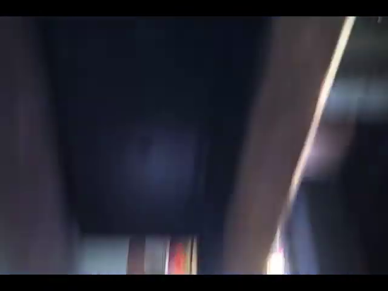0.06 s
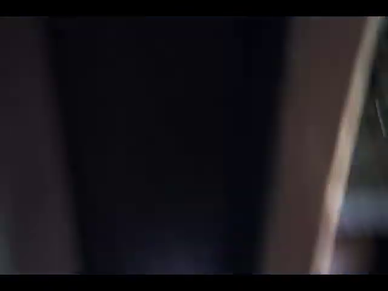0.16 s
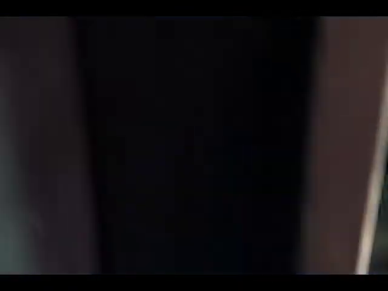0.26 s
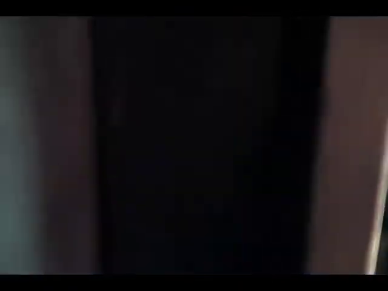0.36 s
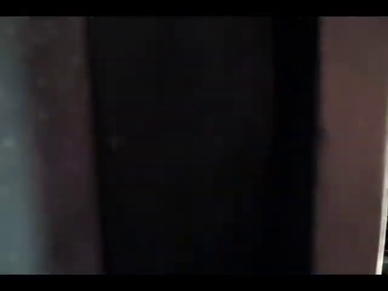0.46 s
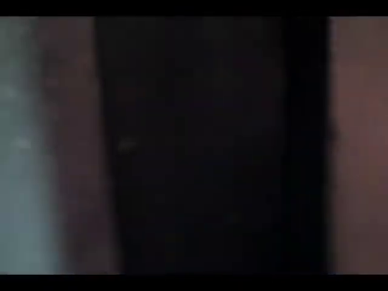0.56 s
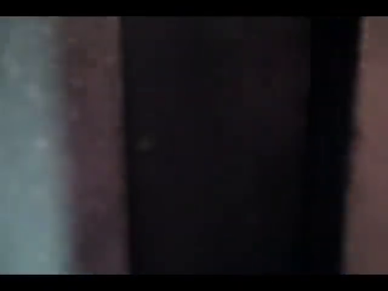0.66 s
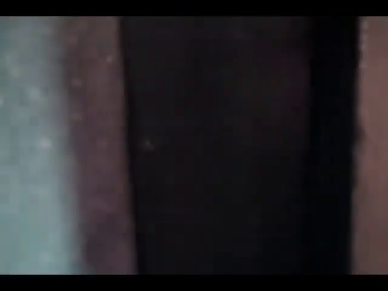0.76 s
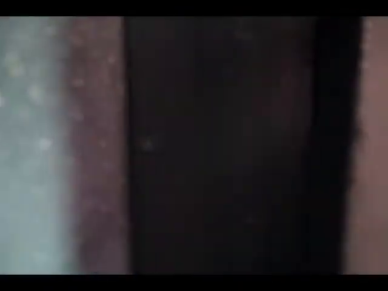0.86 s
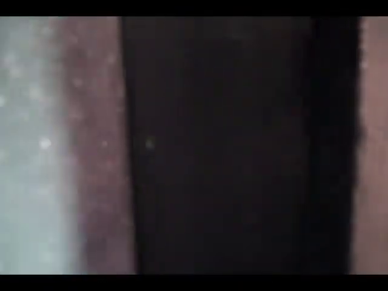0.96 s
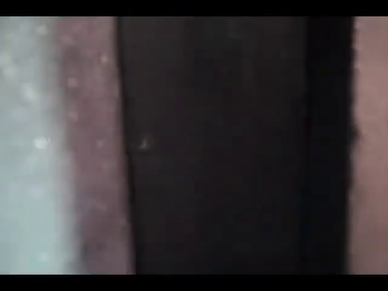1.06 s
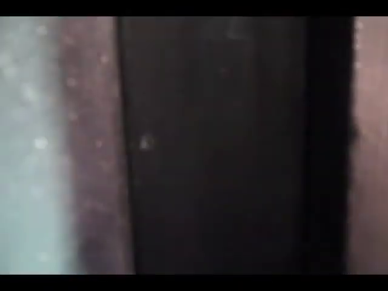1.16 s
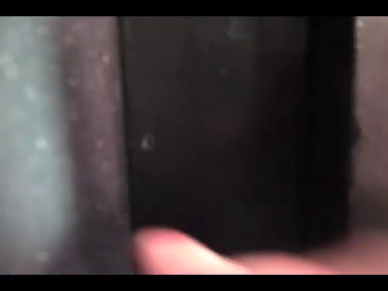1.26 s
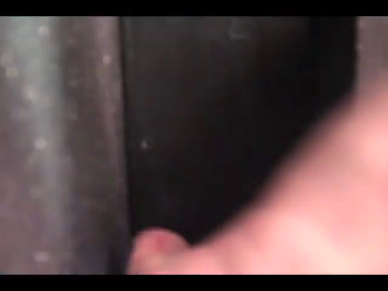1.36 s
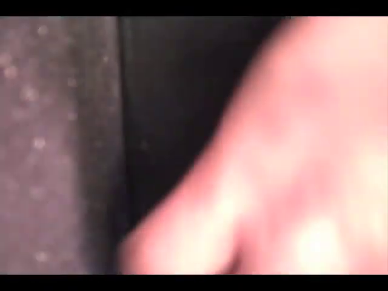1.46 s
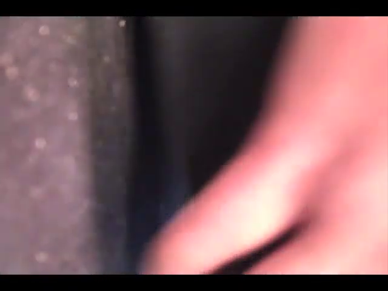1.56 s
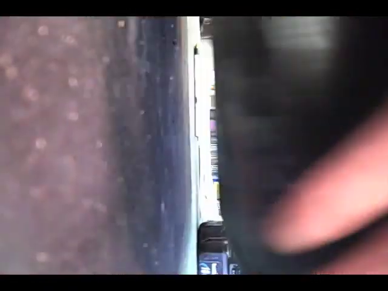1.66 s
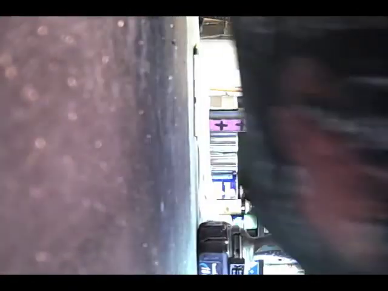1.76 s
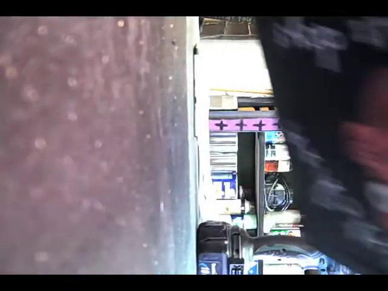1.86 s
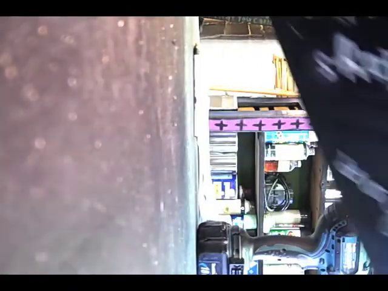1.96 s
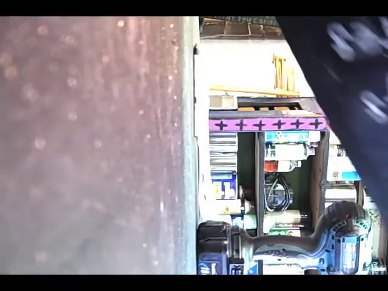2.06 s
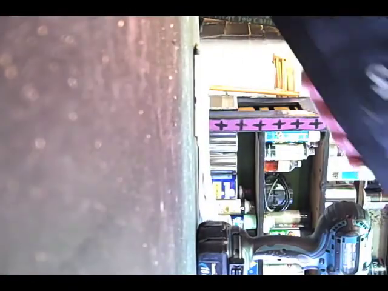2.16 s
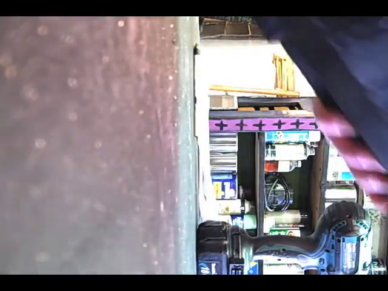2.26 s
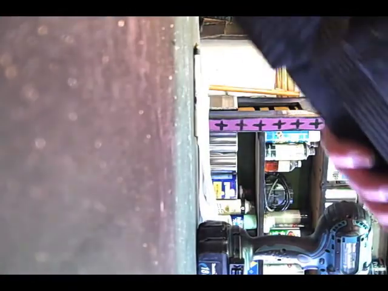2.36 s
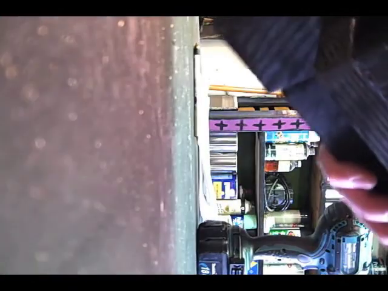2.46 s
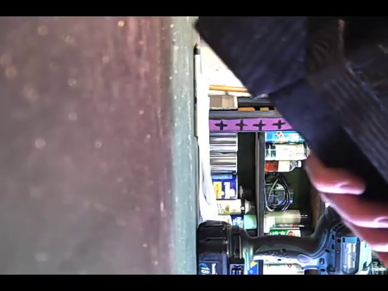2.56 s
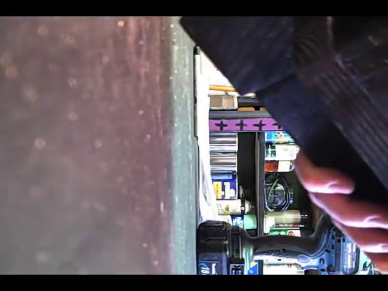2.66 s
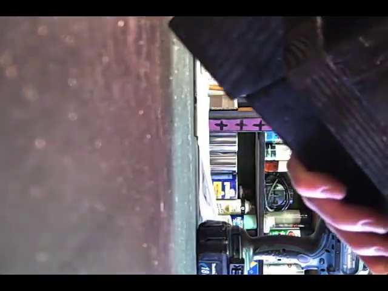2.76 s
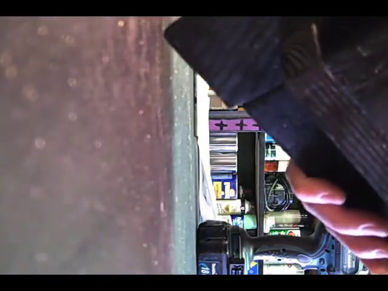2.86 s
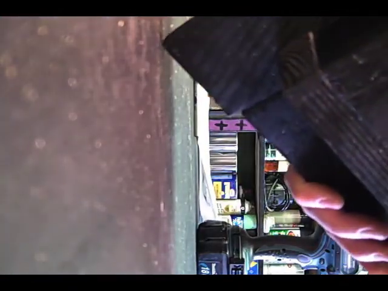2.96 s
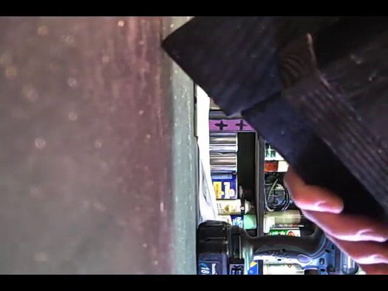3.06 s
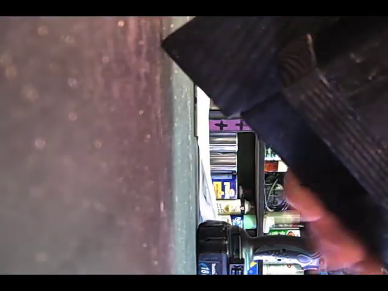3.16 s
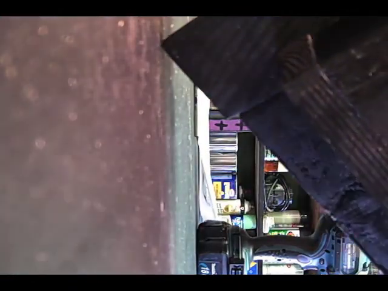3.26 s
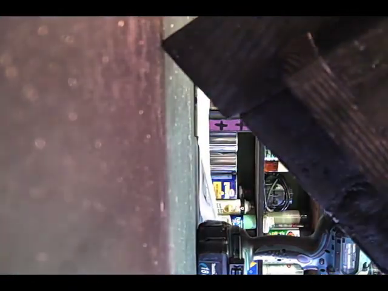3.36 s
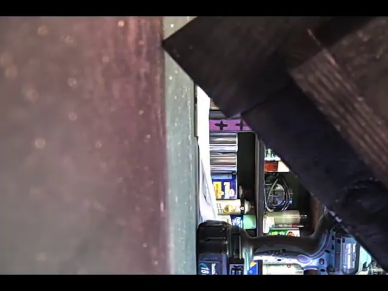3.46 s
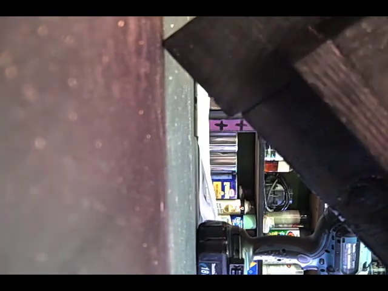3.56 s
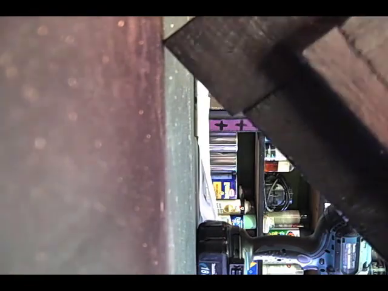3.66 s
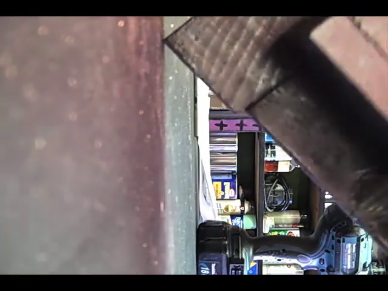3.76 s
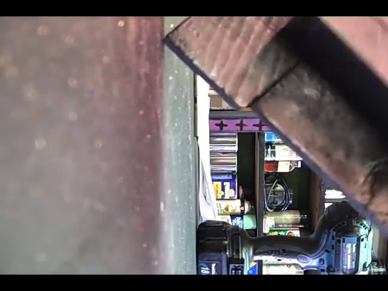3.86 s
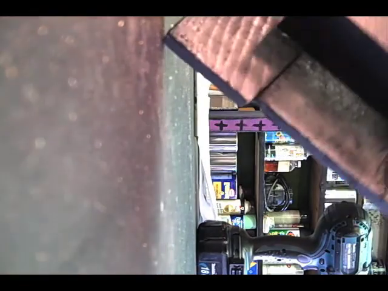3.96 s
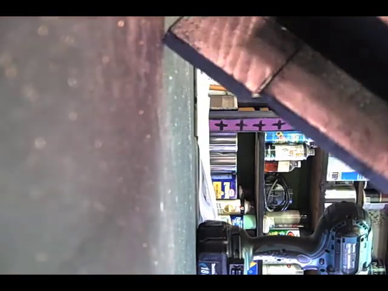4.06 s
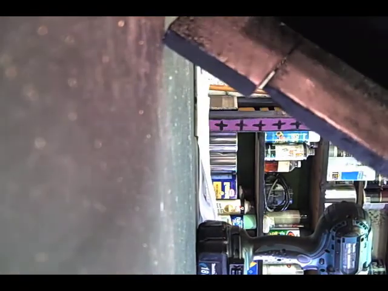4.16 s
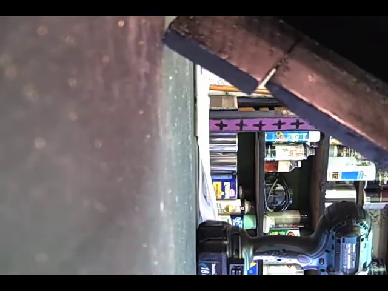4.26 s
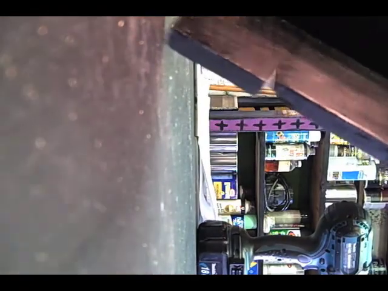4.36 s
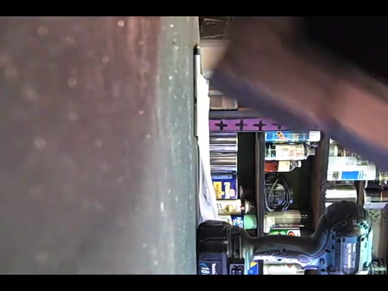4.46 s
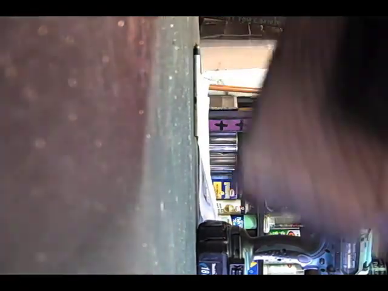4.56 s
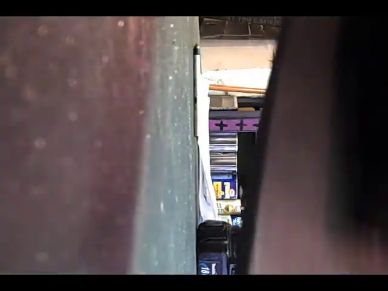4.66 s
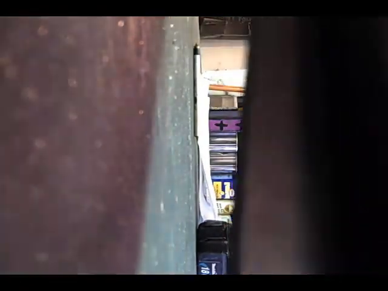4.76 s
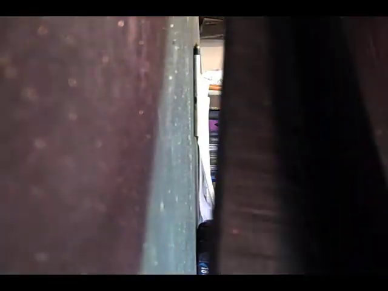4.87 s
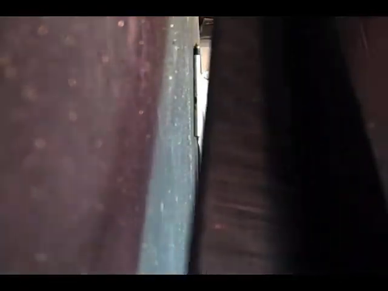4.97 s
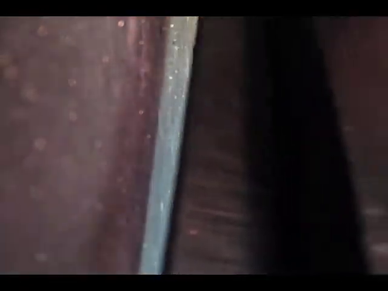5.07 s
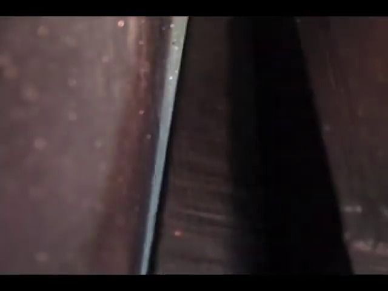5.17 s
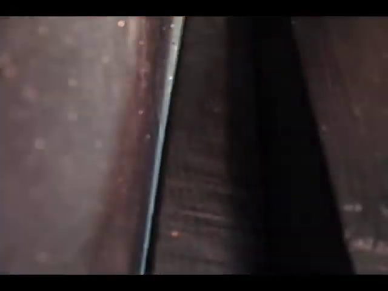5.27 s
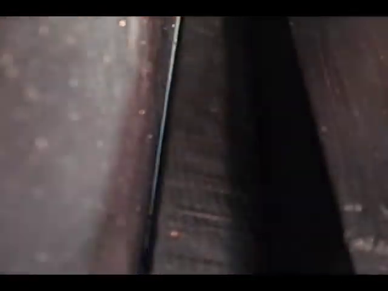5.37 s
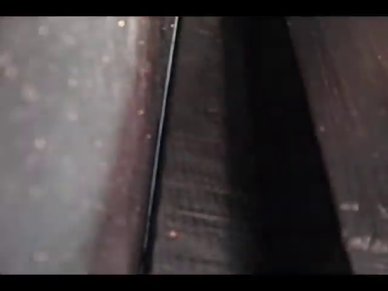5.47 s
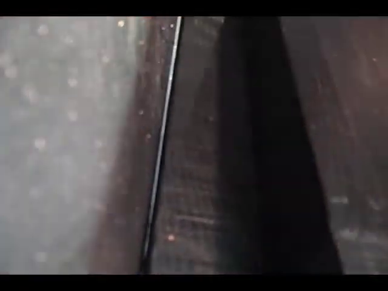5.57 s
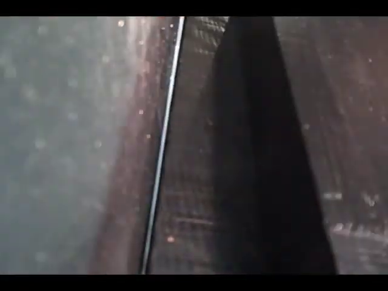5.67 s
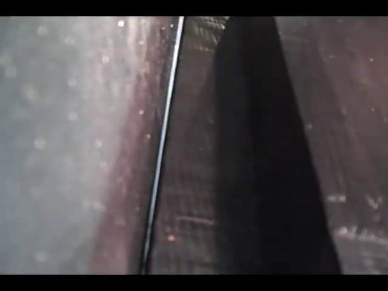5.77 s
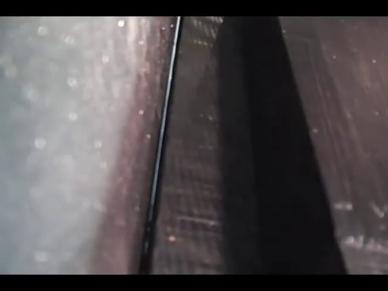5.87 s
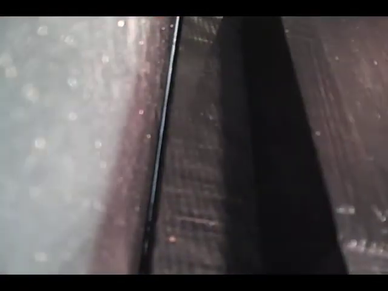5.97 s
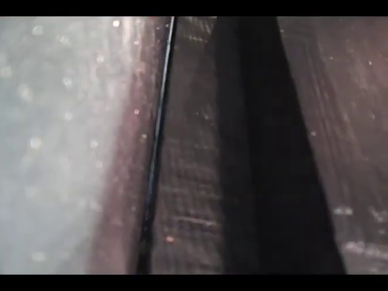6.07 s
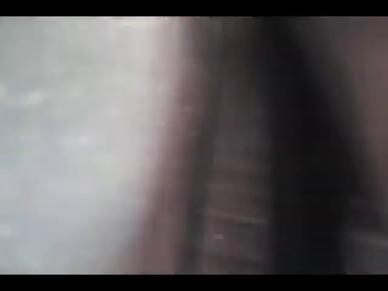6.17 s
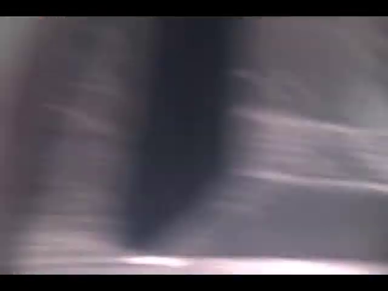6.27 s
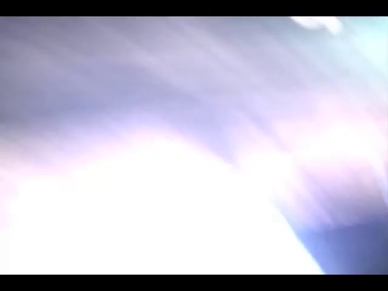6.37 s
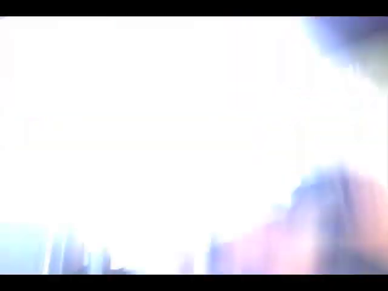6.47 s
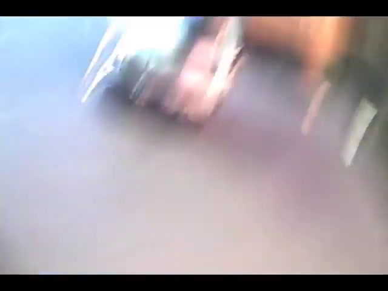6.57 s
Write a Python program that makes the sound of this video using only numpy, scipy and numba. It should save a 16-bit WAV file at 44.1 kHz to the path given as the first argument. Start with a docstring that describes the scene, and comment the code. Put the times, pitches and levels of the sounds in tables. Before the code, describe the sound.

Close handling clatter, then sharp wooden knocks, gritty ticks and quieter dragging as a panel is turned over in a hushed workshop.

```python
"""Grit ticks and fingers brush right at the microphone, then a small camera knocks down on a workshop floor.
Beside it a wooden panel is lifted, dragged, turned and dropped; then the camera is picked up.
Blows ring the resonances of the case or the panel, grit snaps under the panel's edge, and hands and
edges scrape in tiny slips. The case is close and nearly dry; the panel carries into the hushed room."""
import sys
import numpy as np
from scipy import signal
from scipy.fft import rfft, irfft
from scipy.io import wavfile
from scipy.ndimage import uniform_filter1d
from numba import njit

SR = 44100
rng = np.random.default_rng(int(sys.argv[2]) if len(sys.argv) > 2 else 0)


def dump(signal):
    """Clip the signal to [-1, 1] and save it as 16-bit WAV at the path in sys.argv[1]."""
    limited = np.clip(np.atleast_2d(signal).T, -1, 1)
    pcm = np.round(limited * 32767).astype(np.int16)
    wavfile.write(sys.argv[1], SR, pcm)


N = 291091

# Room tone and microphone hiss. Each row: frequency in Hz, relative spectral level in dB.
HUSH_SPECTRUM = [(18, -25), (30, -7), (106, -13), (311, -14), (364, -7.5), (426, -12.5), (2010, -16.5),
                 (4910, -26.5), (14800, -33.5), (16000, -38.5)]
# Faint hum in the room. Each row: pitch in Hz, level in dB.
HUM_LINES = [(360, -67.5), (600, -66)]
# Rumble as the camera settles. Each row: time of full level, rise, hold and fall in seconds, level in dB.
RUMBLE_STROKES = [(.05, .05, .3, .012, -64.5), (.81, 0.044, .27, 0.16, -48.5),
                  (1.89, 0.094, 0.083, 0.21, -50)]
# The loudest grit snaps. Each row: start in seconds, peak in dB, weight of the dull part in dB.
GRIT_SNAPS = [(0.0542, -17.5, -11.5), (1.649, -27.5, -3.5), (1.7579, -22.5, 2.5), (1.9736, -26, 0),
              (2.08, -28, 3), (2.2875, -32.5, -3), (3.094, -39, 2), (3.1093, -25.5, 2), (3.1214, -37, -14),
              (3.3282, -33.5, 0), (4.3855, -21.5, -0.5), (4.4774, -30, -5), (4.5896, -25, 14),
              (4.7034, -23.5, 3.5), (4.908, -32, 6.5), (5.1185, -33, 8.5), (5.243, -22, -12),
              (5.2755, -29, -11), (5.346, -31, -14), (5.38, -29, -1), (5.498, -22, 4), (5.5474, -23, -3.5),
              (5.6695, -26.5, 2), (5.6998, -29.5, 13), (5.77, -27.5, 8), (5.9208, -25, 9), (6.4051, -24, 0),
              (3.4281, -34.5, 8.5), (5.8032, -34.5, 4), (5.9, -34.5, -5), (6.554, -32, -21.5)]
# Fingers on the case. Each row: time of full level, rise, hold and fall in seconds, level in dB.
FINGER_STROKES = [(.058, 0.0048, 0.0061, 0.023, -32), (.164, .011, 0.014, 0.046, -39.5),
                  (.272, 0.023, .003, 0.058, -51), (.414, .003, 0.023, .005, -31.5),
                  (.466, .005, 0.0041, .05, -37.5), (.586, .026, 0.056, 0.0093, -53),
                  (.684, .007, .003, .07, -54), (.894, 0.0095, 0.0027, 0.0071, -43.5),
                  (6.03, 0.028, 0.029, 0.1, -55), (6.15, 0.024, 0.083, .005, -51)]
# Resonances of skin on plastic, the case and the panel. Each row: centre in Hz, width in Hz, gain in dB.
FINGER_MODES = [(3500, 3000, -4), (7500, 700, 1.5), (9700, 1200, -2), (12300, 3000, -16.5)]
CASE_MODES = [(402, 95, 3.5), (986, 100, -7), (2258, 110, -6), (2670, 200, -12.5), (3330, 47, -17),
              (3400, 67, -24), (3680, 10, -7), (5060, 120, -4.5), (5610, 130, -5), (7120, 270, 0.5),
              (8440, 54, -12.5), (7660, 36, -20), (9000, 40, -28.5), (8840, 25, -8.5), (9950, 230, -2.5),
              (10600, 89, -24.5), (10670, 52, -6.5), (12500, 220, -25.5), (13400, 120, -15.5),
              (13800, 67, -25)]
PANEL_MODES = [(366, 79, 39), (608, 450, -6), (1016, 8.7, 3.5), (1435, 8.8, 9), (2410, 260, 10),
               (2830, 60, -32), (3400, 240, -24), (3480, 31, 3), (3950, 78, -11), (5470, 74, -41),
               (5550, 23, 1.5), (5300, 100, -22), (5970, 66, -22), (7150, 48, 6), (9000, 110, -73),
               (10100, 180, -55), (10700, 350, -19), (11700, 270, -9)]
# Blows on the case and on the panel. Each row: start in seconds, levels of thud, body, crack and fizz
# in dB, thud pitch in Hz, weight of the thud's deep part in dB.
CASE_BLOWS = [(0.366, -10, -7.5, -8.5, -5, 360, -27), (0.37, -44.5, -21.5, -15, -18, 345, -6.5),
              (0.387, -19, -16.5, -17, -10.5, 598, -20.5), (0.391, -21, -30.5, -28, -31, 298, -17),
              (0.4, -42, -21.5, -22, -14, 460, -24.5), (0.405, -35, -46, -23, -17, 580, -20),
              (0.441, -30, -54, -35.5, -32, 604, -16), (0.448, -15, -22, -50, -17, 495, -7),
              (0.452, -13, -42, -21, -38, 388, -34.5), (0.456, -16.5, -52, -46, -47, 424, -12),
              (6.171, -49, -46, -44, -61, 339, -21), (6.189, -39.5, -43, -62, -49, 278, -17),
              (6.21, -37, -27, -29, -39, 199, -18), (6.2135, -43, -21, -30, -28, 250, -27),
              (6.217, -7, -17, -22, -17, 298, -29), (6.241, -14, -19, -16, -13.5, 270, -24)]
PANEL_BLOWS = [(0.681, -45.5, -47, -50.5, -53, 337, -21), (1.328, -22.5, -23, -24.5, -37.5, 398, -20),
               (1.334, -20, -24, -25, -38, 573, -19), (1.339, -45, -24, -29, -34, 550, -25.5),
               (1.496, -33, -25, -17, -27.5, 390, -29), (1.4995, -31, -22.5, -20, -29, 425, -30),
               (1.517, -12, -11, -6.5, -17.5, 635, -15.5), (1.526, -18, -20.5, -29, -42, 386, -26),
               (1.538, -28, -27, -22, -30, 380, -18), (3.017, -30.5, -38.5, -40.5, -56, 504, -24),
               (3.030, -30, -33, -51, -37, 574, -5.5), (3.04, -27, -49, -55, -59, 466, -24.5),
               (4.325, -46.5, -38, -40, -46.5, 569, -19.5), (4.346, -43.5, -46, -41.5, -51, 363, 0.5),
               (5.033, -47, -52, -54, -69.5, 554, -18), (5.205, -19.5, -30.5, -42, -52, 405, -5),
               (5.213, -22, -12, -14, -32, 395, -9), (5.221, -23.5, -34, -37, -51, 490, -1),
               (5.303, -25, -44, -44, -41.5, 393, -2), (5.311, -22.5, -15, -17, -32, 420, -24),
               (5.320, -26, -26, -40, -60, 552, 3), (5.405, -34.5, -60, -61, -53, 535, -5),
               (5.535, -38, -41, -45.5, -47, 452, -40), (5.656, -42, -35.5, -45, -55, 523, -14)]
# The edges of those four bands, in Hz.
BAND_EDGES_HZ = [60, 600, 1900, 5000, 16000]
# Thin tones that linger in the case. Each row: pitch in Hz, relative level in dB, seconds to fall 60 dB.
RING_TONES = [(417.3, -3.5, 1.1), (1253, 1.5, 0.99), (2499, -7.5, .6), (3870, -5, 0.087), (7600, -2, 0.16),
              (8100, -5.5, 0.1)]
# The blows that start them. Each row: start in seconds, gain of the low and of the high tones in dB.
RING_STRIKES = [(.367, -30, -36), (.401, -51, -37.5), (.452, -40, -31.5), (6.242, -48, -34)]
# Edges and palms dragging over wood. Each row: time of full level, rise, hold and fall in seconds,
# level in dB, grit and hiss in dB relative to it, contact resonance in Hz.
DRAG_STROKES = [(.47, .008, 0.024, .012, -41, -12, -22, 3300),
                (1.05, 0.075, 0.076, 0.21, -54, -26, -12, 1600),
                (1.314, 0.027, 0.0037, 0.025, -42, -21, -13, 2200),
                (1.343, 0.0062, 0.04, 0.023, -30.5, -5, -11.5, 1190),
                (1.41, 0.0054, .003, 0.04, -47, -14, -12, 885),
                (1.486, 0.04, 0.0025, 0.0085, -31, -22, -22, 696),
                (1.55, 0.0021, .003, 0.043, -32, -3, 1.5, 755),
                (1.646, .1, .003, 0.1, -45.5, -13.5, -17, 890),
                (1.735, 0.067, .005, .015, -49.5, -26.5, -17, 1080),
                (1.848, 0.027, 0.046, 0.11, -39.5, -4, -14, 1820),
                (2.086, 0.1, 0.064, 0.11, -45.5, -9, -11.5, 1720),
                (2.29, 0.1, .005, 0.041, -47.5, -11, -17, 1240),
                (3.06, .006, .003, .045, -54, -30, -14, 650),
                (3.116, 0.04, .003, 0.083, -54, -18, -20, 1070),
                (3.209, 0.03, .034, 0.018, -36, -7, -10.5, 1610),
                (3.6, 0.074, 0.0078, 0.1, -37.5, -28, -33, 1720),
                (3.733, 0.19, 0.0066, 0.065, -33.5, -12, -29, 1810),
                (3.95, .07, .12, 0.047, -39, -25, -40, 2400),
                (4.306, 0.12, 0.19, 0.044, -44, -12.5, -16, 930),
                (4.572, 0.047, 0.0069, 0.045, -38, -11.5, -18, 1460),
                (4.71, .006, 0.09, 0.086, -47, -12, -26.5, 1340),
                (5.235, .006, .003, 0.042, -46, -18, -5, 830),
                (5.335, .006, .003, 0.046, -50, -11, -18, 1100),
                (5.413, .035, .003, .07, -42, -27, -18, 684),
                (5.46, .05, 0.065, 0.092, -50.5, -11.5, -20, 1420),
                (5.621, 0.076, 0.0034, 0.085, -36.5, -24, -24, 1070),
                (5.797, .04, 0.0043, 0.017, -46.5, -19, -16, 1080),
                (5.865, 0.03, 0.0044, 0.019, -35, -38, -27, 1020),
                (5.925, 0.057, .003, 0.071, -36.5, -29, -28, 1020),
                (6.322, 0.027, 0.0046, 0.32, -38.5, -19, -14.5, 1200)]
# A palm on the case. Each row: time of full level, rise, hold and fall in seconds, level in dB,
# pitch in Hz.
PALM_STROKES = [(.56, 0.029, .045, .015, -53, 426), (6.028, 0.014, .003, 0.16, -40, 1215),
                (6.162, 0.035, 0.0038, .005, -43.5, 1230), (6.268, 0.0051, .003, 0.033, -35.5, 1360),
                (6.32, 0.056, 0.067, 0.059, -40, 1340)]

BLOW_SAMPLES = 8192


def undb(db):
    """Gain of a level in dB."""
    return 10 ** (np.asarray(db) / 20)


def unit(x):
    """Scaled to rms 1."""
    return x / np.sqrt(np.mean(x ** 2))


def mode(f, hz, width_hz):
    """Response of one resonance, gain 1 at its centre."""
    return 1j * f * width_hz / (hz ** 2 - f ** 2 + 1j * f * width_hz)


def add(track, start_s, sound):
    """Mix a short sound into the track."""
    i = int(start_s * SR)
    track[i:i + len(sound)] += sound[:N - i]


def through(x, modes, passes=1):
    """A long signal through resonances given as (Hz, width in Hz, dB), once or several times over."""
    f = np.fft.rfftfreq(N, 1 / SR)
    response = sum(undb(db) * mode(f, hz, width) for hz, width, db in modes)
    return irfft(rfft(x) * response ** passes, N)


@njit
def sweep(x, hz, damping):
    """State-variable band-pass whose centre moves."""
    out, band, low = np.empty(len(x)), 0., 0.
    for i in range(len(x)):
        g = np.tan(np.pi * hz[i] / SR)
        v = (band + g * (x[i] - low)) / (1 + g * (g + damping))
        band, low = 2 * v - band, low + 2 * g * v
        out[i] = damping * v
    return out


def walk(per_s):
    """A glide between random values; spread near 1."""
    step = int(SR / per_s)
    return uniform_filter1d(np.repeat(rng.standard_normal(N // step + 1), step), step)[:N]


def friction(spread_db, per_s):
    """Dense slips of uneven size over a fine, fluttering hiss."""
    slips = (rng.random(N) < per_s / SR) * undb(spread_db * rng.exponential(size=N))
    return rng.standard_normal(N) * (1 + 0.43 * unit(slips)) * undb(2.2 * walk(80))


def stroke(full_s, rise_s, hold_s, fall_s, level_db):
    """Gain of one stroke: it swells 20 dB in rise_s, holds, and dies away 20 dB in fall_s."""
    t = np.arange(N) / SR
    away = np.maximum((full_s - t) / rise_s, 0) + np.maximum((t - full_s - hold_s) / fall_s, 0)
    return undb(level_db - 20 * np.minimum(away, 10))


def strokes(table):
    """Gain of all strokes together, and each stroke's share of the power over time."""
    powers = np.array([stroke(*row[:5]) for row in table]) ** 2
    total = powers.sum(axis=0)
    return np.sqrt(total), powers / total


def room_tone(level_db=-52.5):
    """Room noise and microphone hiss that swell a little, with a faint wavering hum."""
    f, t = np.fft.rfftfreq(N, 1 / SR), np.arange(N) / SR
    points_hz, points_db = np.transpose(HUSH_SPECTRUM)
    colour = undb(np.interp(np.log(f + 1), np.log(points_hz), points_db))
    noise = unit(irfft(rfft(rng.standard_normal(N)) * colour, N))
    hum = sum(undb(db + 3.0 * walk(19)) * np.sin(2 * np.pi * hz * t) for hz, db in HUM_LINES)
    return noise * undb(level_db + 0.49 * walk(4.6)) + hum


def handling_rumble():
    """Deep handling noise at the microphone while the camera settles."""
    gain, _ = strokes(RUMBLE_STROKES)
    return gain * unit(through(rng.standard_normal(N), [(12, 18, 0)], passes=2))


def grit_ticks(decay_s=0.00024, tail_s=0.0045):
    """Grit snaps under the panel's edge: a bright, sharp tick with a duller part below."""
    out, f, t = np.zeros(N), np.fft.rfftfreq(512, 1 / SR), np.arange(512) / SR
    envelope = np.exp(-t / decay_s) + 0.23 * np.exp(-t / tail_s)
    # fainter snaps as the dropped panel is pushed into place
    faint = [(rng.uniform(5.25, 6.2), -32.5 + 0.5 * rng.standard_normal(), -5) for _ in range(10)]
    for start_s, peak_db, dull_db in GRIT_SNAPS + faint:
        colour = mode(f, 8100, 7000) ** 2 + undb(dull_db) * 3 * mode(f, 1360, 1500)
        snap = irfft(rfft(rng.standard_normal(len(t)) * envelope) * colour)
        add(out, start_s, undb(peak_db) * snap / np.abs(snap).max())
    return out


def finger_brush():
    """Skin slides on plastic right next to the microphone: a bright hiss."""
    gain, _ = strokes(FINGER_STROKES)
    return gain * unit(through(friction(spread_db=2.2, per_s=4900), FINGER_MODES))


def blows(table, modes, contact_s, deep_hz, loss, thud_loss, snap_db, scatter_db):
    """Each rough contact gives a thud, then damped modes and a broad snap in three higher bands."""
    out, f, t = np.zeros(N), np.fft.rfftfreq(BLOW_SAMPLES, 1 / SR), np.arange(BLOW_SAMPLES) / SR
    hz, width, db = (column[:, None] for column in np.transpose(modes))
    bands = [mode(f, np.sqrt(lo * hi), 1.08 * (hi - lo)) ** 3 / (1 + (1.1 * lo / (f + 1)) ** 4)
             for lo, hi in zip(BAND_EDGES_HZ[1:], BAND_EDGES_HZ[2:])]
    # a short push that swells and dies, then a faint rattle as the contact settles
    rise = t / contact_s
    push = rise ** 2 * np.exp(-2 * rise)
    rattle = undb(-28.5) * (1 - np.exp(-rise)) * np.exp(-t / 0.0084)
    for start_s, *levels_db, thud_hz, deep_db in table:
        rough = rng.standard_normal(BLOW_SAMPLES) * (push + rattle)
        # one clean impact at the height of the push
        impact = 0.65 * np.sqrt(np.sum(rough ** 2)) * np.exp(-2j * np.pi * f * contact_s)
        # grip and contact point change pitch and strength of every mode; hands and floor damp them
        size, detune, polarity = rng.standard_normal((3, len(modes), 1))
        strength = undb(db + scatter_db * size) * np.sign(polarity)
        struck = strength * mode(f, hz * (1 + 0.034 * detune), width + loss * hz)
        knock = (impact + rfft(rough)) * (struck.sum(axis=0) + undb(snap_db))
        deep = undb(deep_db) * mode(f, deep_hz, 1.06 * deep_hz)
        thud = (impact + 0.39 * rfft(rough)) * (mode(f, thud_hz, thud_loss * thud_hz) ** 2 + deep)
        for level_db, spectrum in zip(levels_db, [thud] + [knock * band for band in bands]):
            sound = irfft(spectrum)
            rms = np.sqrt(np.sum(sound ** 2) / (SR / 100))  # as if all its energy fell within 10 ms
            add(out, start_s, undb(level_db) * sound / rms)
    return out


def case_knocks():
    """The camera is set down and picked up: dead thuds and clacks in the case around the microphone."""
    return blows(CASE_BLOWS, CASE_MODES, contact_s=0.0011, deep_hz=130,
                 loss=0.045, thud_loss=1.7, snap_db=-11, scatter_db=4)


def case_ring(split_hz=3000):
    """Thin tones ring on inside the case after the hardest blows."""
    out, t = np.zeros(N), np.arange(3 * BLOW_SAMPLES) / SR
    for start_s, low_db, high_db in RING_STRIKES:
        for hz, db, t60 in RING_TONES:
            struck_db = low_db if hz < split_hz else high_db
            add(out, start_s, undb(struck_db + db - 60 * t / t60) * np.sin(2 * np.pi * hz * t))
    return out


def panel_drag(echo_s=0.0012, echo_db=-8):
    """Slips pass a moving contact resonance and set the panel going; finer slips add grit and hiss."""
    gain, shares = strokes(DRAG_STROKES)
    grit_db, hiss_db, contact_hz = np.transpose(DRAG_STROKES)[5:]
    slips = friction(spread_db=1.5, per_s=2500)
    contact = sweep(slips, contact_hz @ shares, damping=1.0)
    ringing = through(contact, [(hz, width, 0) for hz, width, _ in PANEL_MODES])
    wood = unit(through(unit(contact) + undb(-13) * unit(ringing), [(1230, 3550, 0)], passes=2))
    grit = unit(through(friction(spread_db=0.76, per_s=3000), [(5000, 4200, 0)], passes=3))
    grit *= np.sqrt(undb(grit_db) ** 2 @ shares)
    hiss = unit(through(friction(spread_db=1.2, per_s=5000), [(9800, 15000, 0)], passes=2))
    hiss *= np.sqrt(undb(hiss_db) ** 2 @ shares)
    boom = unit(through(through(slips, PANEL_MODES[1:2]), [(520, 480, 0)]))
    direct = wood + grit + hiss + undb(-10) * boom
    # the floor's echo, which wanders as the panel turns, combs the scrape into bands
    samples = np.arange(N)
    lag = SR * echo_s * (1 + 0.17 * np.sin(2 * np.pi * 0.4543 * samples / SR))
    echo = np.interp(samples - lag, samples, direct)
    return gain * (direct + undb(echo_db) * echo) / np.hypot(1, undb(echo_db))


def palm_rub():
    """A palm resting or closing on the case rubs one of its thin modes into a narrow tone."""
    gain, shares = strokes(PALM_STROKES)
    pitch_hz = np.transpose(PALM_STROKES)[-1] @ shares
    return gain * unit(sweep(friction(spread_db=3.0, per_s=640), pitch_hz, damping=0.081))


def panel_knocks():
    """The wooden panel is knocked and dropped beside the camera: pitched thuds and short wooden rings."""
    return blows(PANEL_BLOWS, PANEL_MODES, contact_s=0.000978, deep_hz=150,
                 loss=0.09, thud_loss=0.48, snap_db=-3, scatter_db=1.5)


def workshop_reverb(x, t60_s=0.22, level_db=-16.5, top_hz=2833):
    """The room answers with a short, dull, diffuse tail."""
    t = np.arange(SR // 2) / SR
    tail = signal.lfilter(*signal.butter(1, top_hz, fs=SR), rng.standard_normal(len(t)))
    tail *= undb(-60 * t / t60_s)
    return undb(level_db) * signal.fftconvolve(x, tail / np.sqrt(np.sum(tail ** 2)))[:N]


def scene():
    """One microphone at floor level: the case sounds nearly dry, the panel also through the room."""
    panel = panel_knocks() + panel_drag()
    case = case_knocks() + case_ring() + finger_brush() + palm_rub() + handling_rumble()
    close = panel + case + grit_ticks()
    return (close + workshop_reverb(panel + undb(-14) * case) + room_tone())[None]


def record(dry, recovery_s=0.51, knee_db=-26.5, top_hz=16200, dc_offset=-0.002):
    """In the camera the gain dips after loud blows, peaks clip, the top is cut, the converter is off zero."""
    keep = np.exp(-1 / (SR * recovery_s))
    power = signal.lfilter([1 - keep], [1, -keep], dry ** 2)
    gain = (1 + power / undb(knee_db) ** 2) ** -0.11
    clipped = np.clip(dry * gain, -0.93, 0.93)
    lowpass = signal.ellip(10, 0.2, 60, top_hz, fs=SR, output="sos")
    return np.clip(signal.sosfilt(lowpass, clipped) + dc_offset, -1, 1)


dry = scene()
out = record(dry)
dump(out)
```